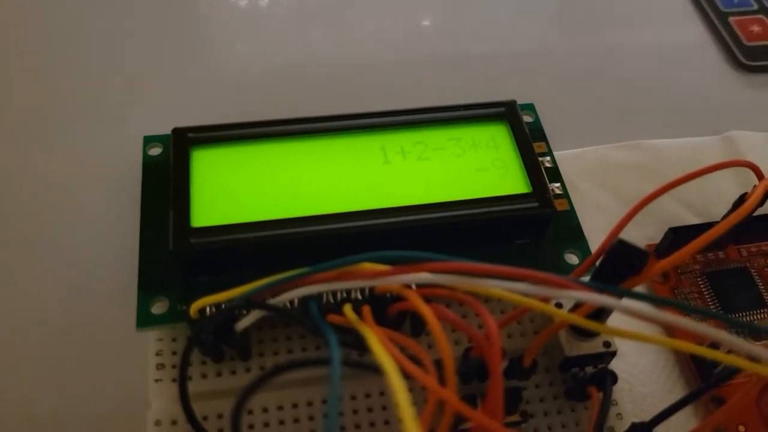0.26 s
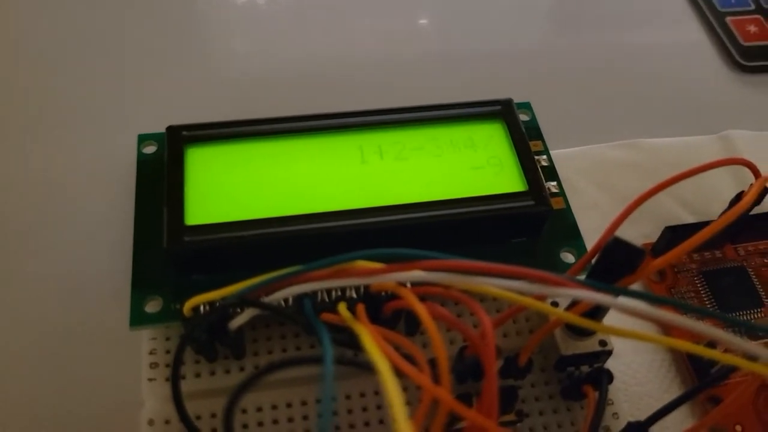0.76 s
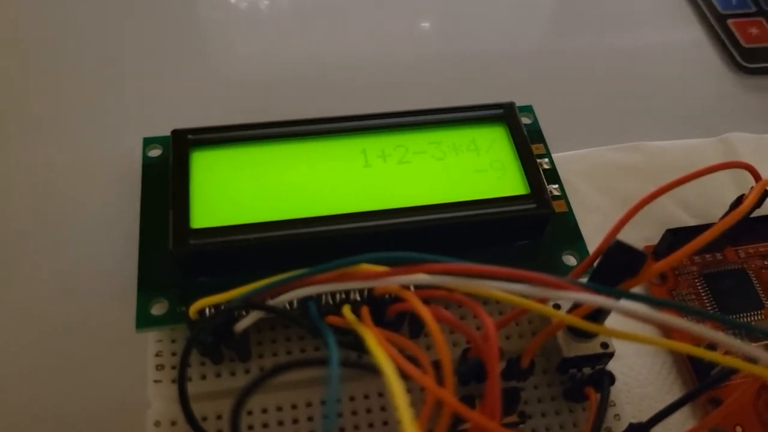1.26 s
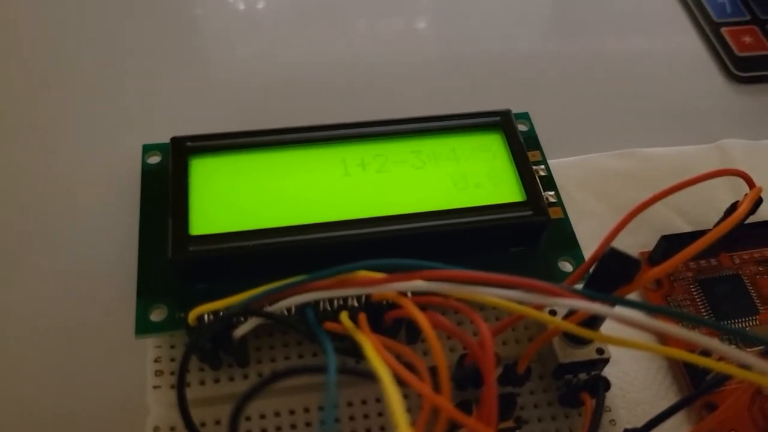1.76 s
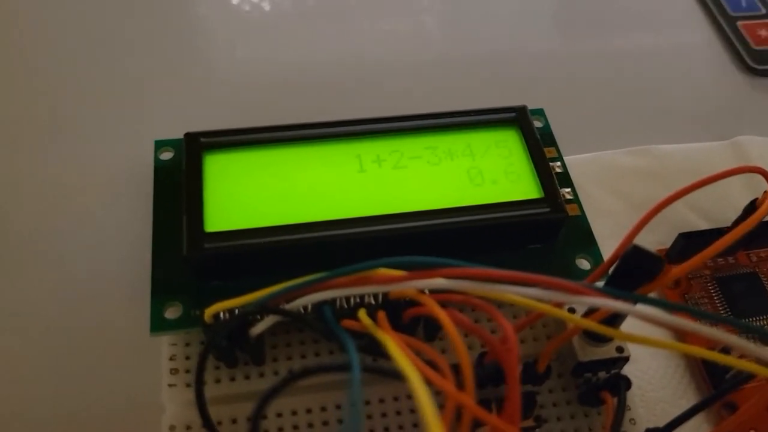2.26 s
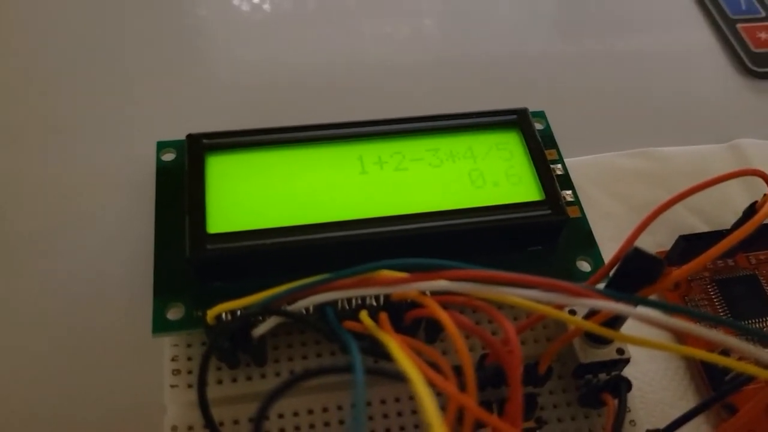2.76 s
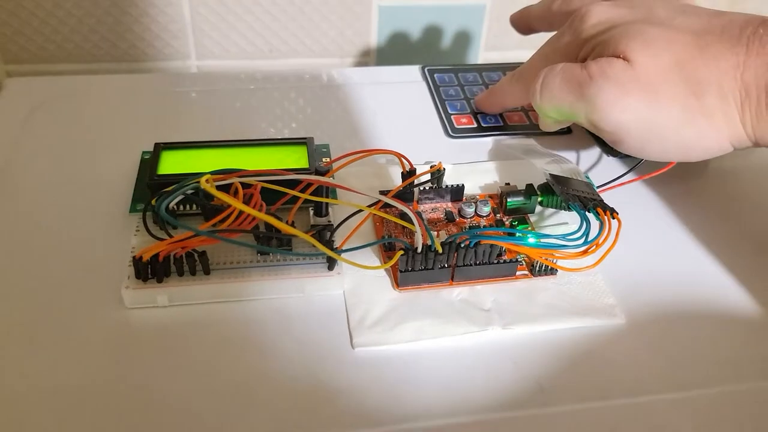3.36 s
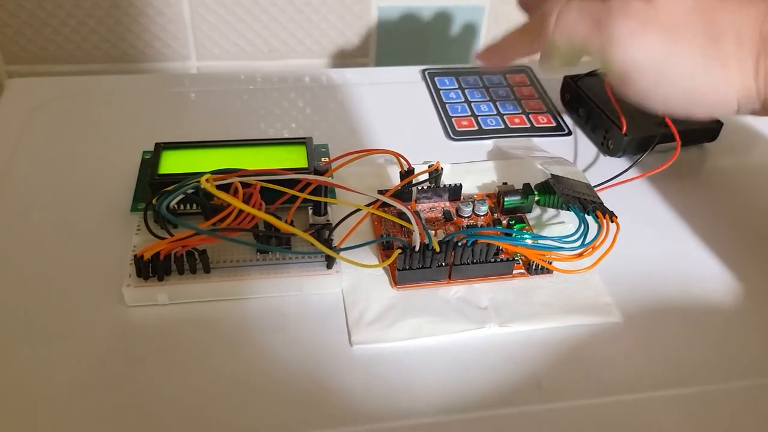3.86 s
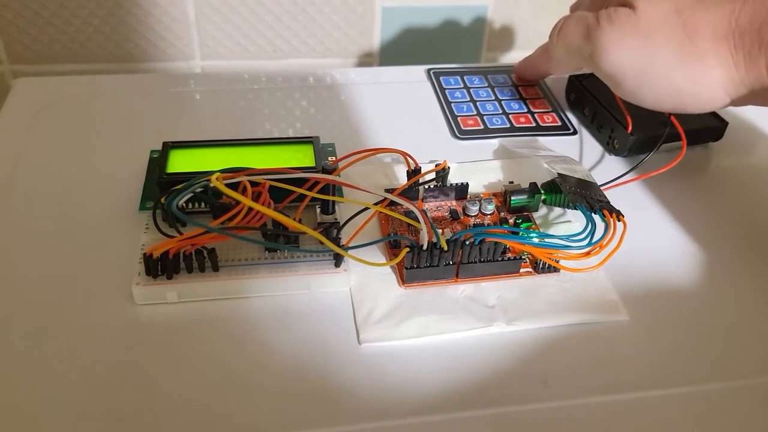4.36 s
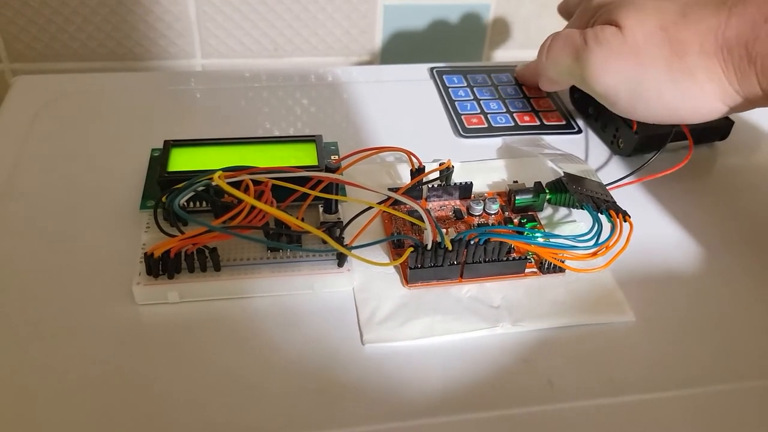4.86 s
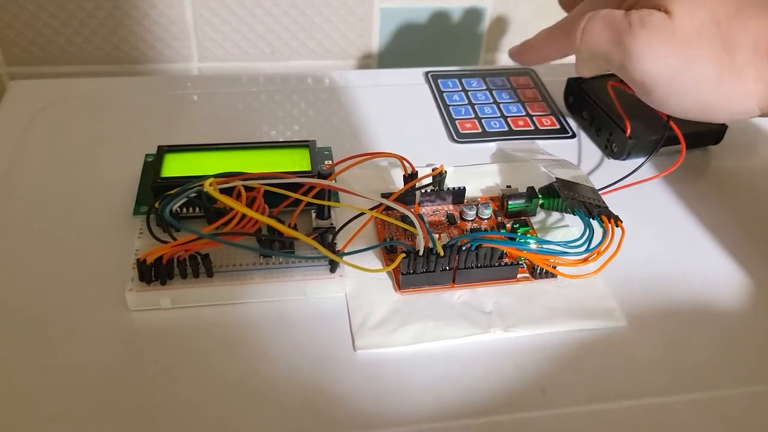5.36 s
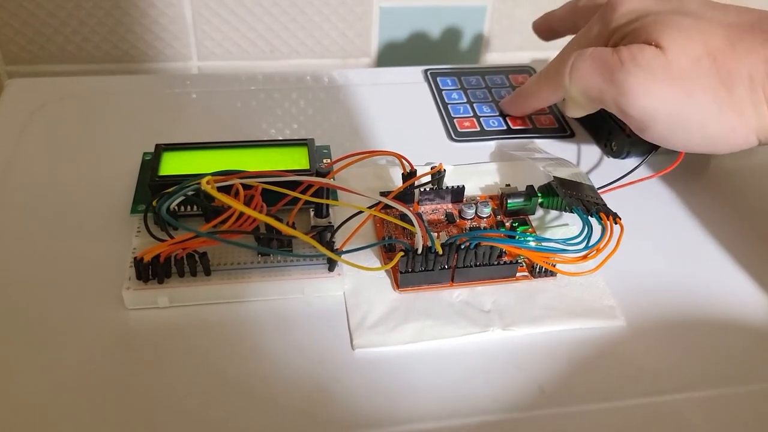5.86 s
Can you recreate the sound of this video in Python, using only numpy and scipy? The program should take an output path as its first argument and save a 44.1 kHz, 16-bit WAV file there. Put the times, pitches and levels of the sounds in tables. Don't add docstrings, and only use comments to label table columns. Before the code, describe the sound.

Uneven, isolated key presses heard by a nearby phone microphone: small plastic ticks, dull low thuds and hollow knocks with a short tiled-room tail. The first half has a cluster of taps, a tiny low groan and one rounded knock over quiet rumble and hum. After an abrupt cut, a slightly louder fan runs steadily under a sharp snap-back with a thin squeak, faint contacts, and a final loud knock.

```python
import sys
import numpy as np
from scipy import signal
from scipy.fft import rfft, irfft
from scipy.io import wavfile
from scipy.ndimage import uniform_filter1d

SR = 44100
rng = np.random.default_rng(int(sys.argv[2]) if len(sys.argv) > 2 else 0)


def wav_record(signal):
    frames = np.transpose(np.atleast_2d(signal))
    bounded = np.clip(frames, -1, 1)
    quanta = np.round(bounded * 32767).astype(np.int16)
    wavfile.write(sys.argv[1], SR, quanta)


def convert_level_to_amplitude(level_db):
    exponent = np.asarray(level_db, float) / 20
    return 10 ** exponent


N = 269010

SPLICE_S = 3.1607
LEAD, LENGTH = 900, 19000
PORTS = np.array([[1], [-1]])
BANDS_HZ = 56 * 2 ** np.arange(0, 8.2, 1 / 3)
BANDS = [signal.butter(2, [hz / 1.122, min(hz * 1.122, 17000)], "bandpass", fs=SR, output="sos")
         for hz in BANDS_HZ]
# (bass [Hz], body [Hz], pivot [Hz], treble [Hz])
KEY_TRIM_HZ = (250, 600, 1100, 5000)


def read(table, hz):
    return np.interp(np.log(hz), np.log([row[0] for row in table]), [row[1] for row in table])


def walk(rate):
    k = int(SR / rate)
    held = np.repeat(rng.standard_normal(N // k + 1), k)
    return 0.4 * uniform_filter1d(uniform_filter1d(held, k), k)[:N]


def fade(t60, s):
    return np.exp(-np.log(1000) * s / t60)


def plateau(start_s, length_s, slew_s):
    t = np.arange(N) / SR
    return np.clip(np.minimum(t - start_s, start_s + length_s - t) / slew_s + .5, 0, 1)


def colour(x, db):
    size = 2 * (len(db) - 1)
    cepstrum = irfft(db * np.log(10) / 20, size)
    cepstrum[1:size // 2] *= 2
    cepstrum[size // 2 + 1:] = 0
    return irfft(rfft(x, size) * np.exp(rfft(cepstrum)), size)[:, :x.shape[1]]


def air(tone, db, flicker_db, flicker_rate, peaks=()):
    # (frequency [Hz], level [dB])
    air_side = [(60, -8), (92, -14), (140, -12.5), (220, -8), (340, -2), (520, 0.5), (790, 5.5),
                (1220, 3.5), (1880, 3), (2890, 0)]
    hz = np.maximum(np.fft.rfftfreq(N, 1 / SR), 1)
    gain = convert_level_to_amplitude(read(tone, hz)) * (hz > tone[0][0]) * (hz < tone[-1][0])
    for centre, width, peak_db in peaks:
        gain = gain + convert_level_to_amplitude(peak_db) / (1 + (2 * (hz - centre) / width) ** 2)
    mid, side = rfft(rng.standard_normal((2, N))) * gain
    both = mid + PORTS * side * convert_level_to_amplitude(read(air_side, hz))
    scale = convert_level_to_amplitude(db) / np.std(irfft(mid * (hz > 70), N))
    out = 0
    for octave in range(4, 14):
        share = np.clip(1 - np.abs(np.log2(hz) - octave - .5), 0, 1)
        out = out + irfft(both * share, N) * convert_level_to_amplitude(flicker_db * walk(flicker_rate))
    return scale * out


def hum():
    # (time [s], length [s], level [dB])
    swells = [(0.074, 0.14, -58), (0.354, 0.12, -57.5), (0.598, 0.47, -56.5), (1.66, 0.3, -62),
              (2.128, 0.052, -58), (2.28, 0.13, -58), (2.907, 0.37, -59), (3.413, 0.056, -58),
              (3.624, 0.062, -63), (3.75, 0.091, -59), (4.29, 0.072, -63), (4.444, 0.066, -59),
              (4.675, 0.062, -62), (4.825, 0.037, -61), (4.96, 0.23, -60), (5.29, 0.046, -57),
              (5.414, 0.086, -59.5), (5.803, 0.18, -64)]
    rest_db, trim_db, slew_s = -71.5, -6, 0.055
    phase = 2 * np.pi * np.cumsum(49.8 * (1 + 0.084 * walk(5.7))) / SR
    level = convert_level_to_amplitude(rest_db) + sum(convert_level_to_amplitude(db + trim_db) * plateau(s, length, slew_s) for s, length, db in swells)
    return np.sqrt(2) * level * convert_level_to_amplitude(1.5 * walk(14)) * np.sin(phase) * np.array([[1], [1.05]])


def rumble():
    # (frequency [Hz], level [dB])
    rumble_tone = [(13, -32.5), (22, -17.5), (33, -24.5), (54, -4.5), (67, -10), (76, -18), (108, -8),
                   (194, -23), (221, -40), (320, -31.5), (503, -34), (584, -41), (679, -35), (751, -43.5),
                   (1200, -44.5), (1560, -64), (2640, -120)]
    return air(rumble_tone, -69.5, 3.5, 1.4)


def hiss():
    # (frequency [Hz], level [dB])
    hiss_tone = [(1200, -5), (2000, -1), (2450, -1), (2850, -11.5), (3350, -1.5), (4000, -10.5),
                 (5450, -15.5), (5750, -2.5), (6100, -7.5), (7000, -11), (8500, -20.5), (10500, -21),
                 (12500, -9), (14500, -6.5), (15500, -5.5)]
    return air(hiss_tone, -88.5, .6, 35)


def knock(row, weight, tone, trim_hz, rise_cycles, mode_db, snap_db):
    # (frequency [Hz], level [dB], t60 [s])
    top_modes = [(108.6, 4, 0.27), (120.4, 2, 0.18), (132.3, -4.5, 0.27), (185.3, -11.5, 0.79),
                 (308.6, 5.5, 0.26), (357.3, -11.5, 0.11), (411, -8, 0.18), (468.4, -3, 0.05),
                 (624, -13.5, 0.5), (723, -5, 0.23), (728, -17, 0.52), (950, -22, 0.59)]
    # (frequency [Hz], level [dB], t60 [s])
    dome_modes = [(965, 4.5, 0.12), (1110, 10.5, 0.025), (1540, -35, 0.0352), (2164, 5, 0.11),
                  (1180, -11, 0.38), (1290, -10.5, 0.41), (2020, -4, 0.24), (2610, -15.5, 0.31),
                  (2930, -8.5, .14)]
    # (frequency [Hz], t60 [s])
    ring_t60 = [(80, 0.6), (200, 0.16), (500, .17), (1000, 0.099), (2000, 0.13), (4000, 0.13),
                (10000, 0.054)]
    room_t60 = [(80, 0.33), (300, 0.51), (1000, 0.31), (4000, 0.33), (12000, 0.1)]
    # (frequency [Hz], level [dB])
    hit_side = [(60, -25), (140, -26), (220, -2.5), (340, -11), (520, 6.5), (790, 2.5), (1220, 2.5),
                (1880, 2), (4000, 0.2), (9000, 0.4)]
    hit_pan = [(60, 1.5), (92, -1.5), (140, -0.5), (220, -1), (340, -6), (520, -1), (790, 1), (1220, 4.5),
               (1880, 2), (2890, 1.5)]
    room_db, smear_db, smear_s = -10.5, -26, .011
    patchy_db, patch_size = 3.5, 260

    _, db, weight_db, treble_db, stretch = row
    bass_db = weight[0] + weight[1] * weight_db
    body_db = weight[2] + weight[3] * weight_db
    clock = (np.arange(LENGTH) - LEAD) / SR
    s = np.maximum(clock, 0)
    noise = rng.standard_normal((2, LENGTH))
    smear = convert_level_to_amplitude(smear_db) * np.exp(np.minimum(clock, 0) / smear_s) * (clock < 0)
    out = np.zeros((2, LENGTH))
    for hz, band in zip(BANDS_HZ, BANDS):
        ring = fade(stretch * read(ring_t60, hz), s)
        ring = ring + convert_level_to_amplitude(room_db) * fade(stretch * read(room_t60, hz), s)
        build_up = 1 - np.exp(-s * hz / rise_cycles)
        shape = build_up * ring + smear * np.clip(hz / 1200, .6, 2.5)
        noise = np.roll(noise, 777, axis=1)
        patches = np.sqrt(patch_size) * uniform_filter1d(noise[1, ::-1], size=patch_size)
        drive = noise[0] + PORTS * noise[1] * convert_level_to_amplitude(read(hit_side, hz))
        drive = drive * shape * convert_level_to_amplitude(patchy_db * patches)
        snap = convert_level_to_amplitude(snap_db) * np.sqrt(SR / hz)
        drive[0, LEAD] += snap
        drive[1, LEAD + 14] += snap
        pan = convert_level_to_amplitude(PORTS * read(hit_pan, hz) / 2)
        out += signal.sosfilt(band, drive) * np.sqrt(SR / hz) * pan
    modes = top_modes + dome_modes
    for (hz, over_db, t60), (size, lean) in zip(modes, rng.standard_normal((len(modes), 2))):
        ring = (1 - np.exp(-s * hz / rise_cycles)) * fade(stretch * t60, s)
        level = convert_level_to_amplitude(mode_db + over_db + 1.8 * size + PORTS * read(hit_pan, hz) / 2)
        drift = PORTS * lean * min(hz / 900, 1.2)
        out += level * ring * np.sin(2 * np.pi * hz * s + drift)
    hz = np.maximum(np.fft.rfftfreq(1 << 15, 1 / SR), 20)
    tone_db = read([(20, -60)] + list(tone) + [(22050, tone[-1][1] - 40)], hz) + 10 * np.log10(hz)
    trim_db = read(list(zip(trim_hz, (bass_db, body_db, 0, treble_db))), hz)
    return colour(out, tone_db - tone_db.max() + trim_db) * convert_level_to_amplitude(db - 11)


def blows(table, first_s, last_s, *kind):
    out = np.zeros((2, N + SR))
    for row in table:
        if first_s <= row[0] < last_s:
            start = int(row[0] * SR) - LEAD
            out[:, start:start + LENGTH] += knock(row, *kind)
    return out[:, :N]


def thuds(first_s, last_s):
    # (time [s], peak level [dB], weight [dB], treble trim [dB], decay factor [1])
    thud = [(0.447, -72.5, 2, -1, 1), (0.6115, -26, -6.5, 6, 1), (0.906, -46.5, -3, -16, 1),
            (0.96, -66.5, 11, -24, 0.72), (1.172, -83.5, 21.5, -8, 0.58), (1.957, -54.5, -2, 4.5, 0.89),
            (2.024, -57, 13, -16, 0.62), (2.07, -58.5, 3, -19, 0.84), (2.547, -77, -2.5, -7, 0.6),
            (3.144, -38.5, -3.5, 12, 0.69), (3.306, -64, 15.5, -8, 0.32), (4.614, -72, 3, -6, 0.79),
            (4.858, -41, -8, 4, 1), (5.619, -54.5, -1, -1, 0.82)]
    # (frequency [Hz], level per Hz [dB])
    thud_tone = [(55, -26), (110, 7), (200, -3.5), (320, -4), (520, -6.5), (720, -27.5), (1020, -23),
                 (1600, -44), (2500, -62.5), (6000, -78)]
    # (bass [Hz], body [Hz], pivot [Hz], treble [Hz])
    trim_hz = (110, 320, 550, 1200)
    # (bass [dB], bass per weight [dB/dB], body [dB], body per weight [dB/dB])
    weight = (0.14, 1.1, 1.1, 0)
    return blows(thud, first_s, last_s, weight, thud_tone, trim_hz, .4, 7.5, -0.5)


def presses(first_s, last_s):
    # (time [s], peak level [dB], weight [dB], treble trim [dB], decay factor [1])
    press = [
        (0.575, -35, -2.5, 0.5, 1.48),
        (0.656, -32, -7, -15.5, 0.83),
        (1.48, -32.5, -4, -1.5, 0.92),
        (3.099, -28.5, -6, 0, 0.98),
        (3.395, -34, 0, 0.5, 1.03),
        (4.784, -37, 1, -1, 1.12),
        (5.917, -37, 1, 0, 1.02),
    ]
    # (frequency [Hz], level per Hz [dB])
    press_tone = [(200, -14.5), (420, -0.5), (700, -11.5), (950, 1.5), (1250, 0.5), (1900, -9.5),
                  (2500, -19), (3300, -23), (4200, -31), (6000, -30), (8000, -30.5), (9000, -38),
                  (11000, -38), (15500, -53.5)]
    # (bass [Hz], body [Hz], pivot [Hz], treble [Hz])
    trim_hz = (400, 1050, 2000, 7000)
    # (bass [dB], bass per weight [dB/dB], body [dB], body per weight [dB/dB])
    weight = (-6, -0.25, -2, 1)
    return blows(press, first_s, last_s, weight, press_tone, trim_hz, .6, -1, -7.5)


def ticks(first_s, last_s):
    # (time [s], peak level [dB], weight [dB], treble trim [dB], decay factor [1])
    tick = [
        (0.606, -71, 6, 4, 0.26),
        (0.957, -64, -11, 24, 0.33),
        (2.063, -63.5, -4, 7.5, 0.43),
        (2.62, -73.5, 2, 2, 0.4),
        (2.99, -68.5, 2.5, 0, 0.32),
        (3.283, -61.5, -7, 4, 0.85),
        (3.843, -65, -6, -3, 1.2),
        (3.89, -58, -10, -3, 0.44),
        (5.25, -80, -2, 4, .4),
    ]
    # (frequency [Hz], level per Hz [dB])
    tick_tone = [(500, -32), (1000, 18), (3500, -24), (6000, -2), (8000, -2.5), (9500, -15), (15500, -14.5)]
    # (bass [Hz], body [Hz], pivot [Hz], treble [Hz])
    trim_hz = (600, 1200, 6500, 12500)
    # (bass [dB], bass per weight [dB/dB], body [dB], body per weight [dB/dB])
    weight = (0, 1, 0, 1)
    return blows(tick, first_s, last_s, weight, tick_tone, trim_hz, 9, -60, -16.5)


def near_releases(first_s, last_s):
    # (time [s], peak level [dB], weight [dB], treble trim [dB], decay factor [1])
    near_release = [
        (1.635, -22, 1, -0.28, 0.91),
    ]
    # (frequency [Hz], level per Hz [dB])
    near_tone = [(70, -19), (120, -0.5), (220, -8.5), (320, -1), (600, -6), (1000, -7.5), (1200, -23.5),
                 (2000, -24.5), (2500, -47), (2900, -35.5), (4000, -49.5), (7000, -56.5), (15500, -78)]
    # (bass [dB], bass per weight [dB/dB], body [dB], body per weight [dB/dB])
    weight = (0, 1.8, 0.79, 0.36)
    return blows(near_release, first_s, last_s, weight, near_tone, KEY_TRIM_HZ, .9, 1.7, -5.5)


def releases(first_s, last_s):
    # (time [s], peak level [dB], weight [dB], treble trim [dB], decay factor [1])
    release = [
        (3.552, -17, -7, 3.5, 1.02),
        (6.0605, -15, -5.5, 2.1, 1.13),
    ]
    # (frequency [Hz], level per Hz [dB])
    release_tone = [(70, -11), (115, 1.5), (200, -12.5), (320, 1.5), (550, -10.5), (1050, -5),
                    (1550, -17.5), (1750, -35), (2600, -29.5), (3600, -40.5), (3950, -49.5), (7500, -54.5),
                    (11000, -62), (15500, -74.5)]
    # (bass [dB], bass per weight [dB/dB], body [dB], body per weight [dB/dB])
    weight = (1.5, 1.5, -1.5, 0)
    return blows(release, first_s, last_s, weight, release_tone, KEY_TRIM_HZ, .7, -3, 3)


def keypad(first_s, last_s):
    kinds = (thuds, presses, ticks, near_releases, releases)
    return sum(kind(first_s, last_s) for kind in kinds)


def squeaks():
    # (crest time [s], rise [s], fall [s], crest frequency [Hz], level [dB])
    squeak = [
        (.728, .025, .042, 9550, -100),
        (.728, 0.016, 0.017, 8500, -102),
        (3.606, .03, 0.11, 9800, -89.5),
        (3.862, .008, 0.065, 8130, -90.5),
        (4.04, 0.04, 0.033, 8300, -103),
    ]
    upper_squeak = [
        (3.607, 0.051, 0.094, 11750, -85),
        (3.89, .015, 0.013, 9650, -107),
    ]
    puff_s, edge_s = 0.037, .02
    sag_db = 4
    out = np.zeros(N)
    waver = 1 + .025 * walk(300)
    flutter_db = 13 * walk(60)
    for table, rest_hz in ((squeak, 7740), (upper_squeak, 9550)):
        waver, flutter_db = waver[::-1], flutter_db[::-1]
        for crest_s, rise_s, fall_s, crest_hz, db in table:
            gain = plateau(crest_s - rise_s, rise_s + fall_s, edge_s)
            span = np.flatnonzero(gain)
            pressure = 1 / (1 + ((span / SR - crest_s) / puff_s) ** 2)
            pitch = (rest_hz + (crest_hz - rest_hz) * pressure) * waver[span]
            level = convert_level_to_amplitude(db + 1.5 + flutter_db[span] - sag_db * (1 - pressure))
            out[span] += gain[span] * level * np.sin(2 * np.pi * np.cumsum(pitch) / SR)
    return np.sqrt(2) * out * convert_level_to_amplitude(PORTS * 2.0)


def groan():
    start_s, length_s, slew_s, hz, db = 1.048, .11, 0.033, 215, -75
    tone = np.sin(2 * np.pi * hz * np.arange(N) / SR)
    return convert_level_to_amplitude(db + 3) * plateau(start_s, length_s, slew_s) * tone


def fan():
    # (frequency [Hz], level [dB])
    fan_tone = [(15, -29.5), (25, -10), (38, -12), (76, -2.5), (140, 1), (194, -10.5), (350, -7),
                (447, -13), (494, -5), (558, -21), (712, -13), (891, -26.5), (1030, -23), (1180, -31),
                (3200, -48.5), (4160, -74), (7040, -120)]
    # (frequency [Hz], width [Hz], level [dB])
    fan_peaks = [(155, 18, -12), (314, 8.6, -23), (502, 7.7, -9.5), (660, 81, -18), (714, 22, -23.5),
                 (1037, 20, -14), (1180, 240, -38)]
    start_db, settle_s = -1, 0.11
    since = np.maximum(np.arange(N) / SR - SPLICE_S, 0)
    return air(fan_tone, -60.5, 0.22, 2.7, fan_peaks) * convert_level_to_amplitude(start_db * np.exp(-since / settle_s))


def scene():
    before = keypad(0, SPLICE_S) + rumble()
    after = keypad(SPLICE_S, N / SR) + fan()
    stretches = np.where(np.arange(N) / SR - SPLICE_S < 0, before, after)
    return stretches + hum() + groan() + squeaks() + hiss()


def band_limit(x):
    return signal.sosfilt(signal.butter(12, 15720, fs=SR, output="sos"), x)


def record(dry):
    ceiling = .3
    mix = ceiling * np.tanh(dry / ceiling)
    return band_limit(mix)


dry = scene()
out = record(dry)
wav_record(out)
```